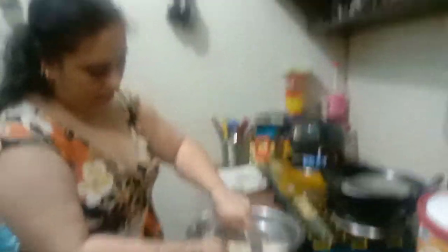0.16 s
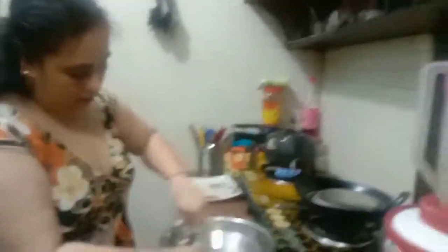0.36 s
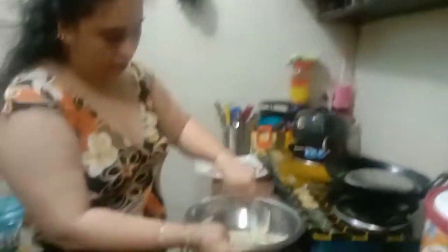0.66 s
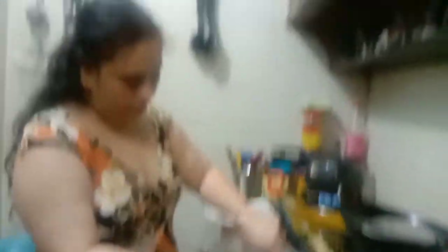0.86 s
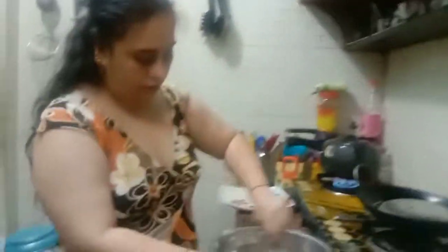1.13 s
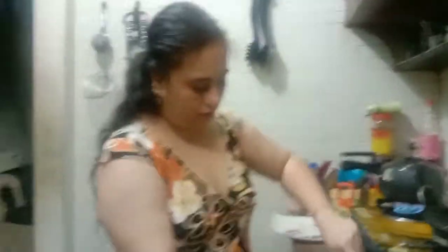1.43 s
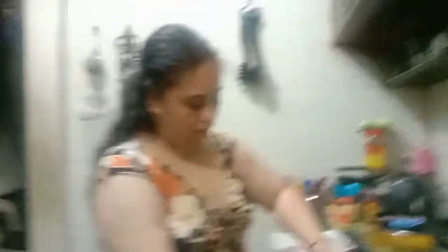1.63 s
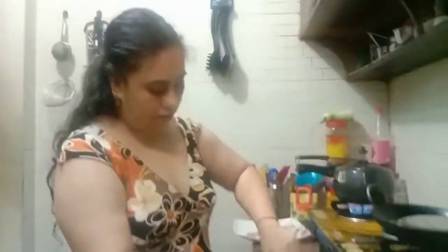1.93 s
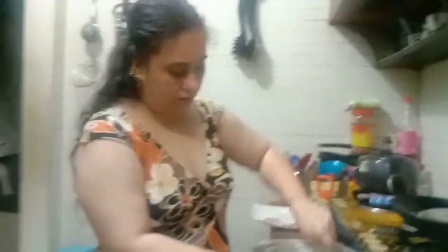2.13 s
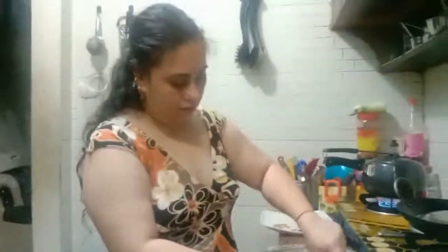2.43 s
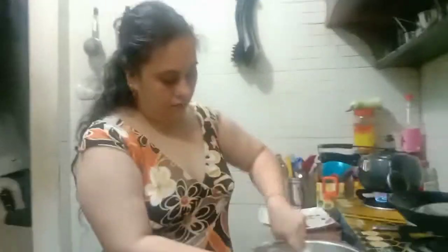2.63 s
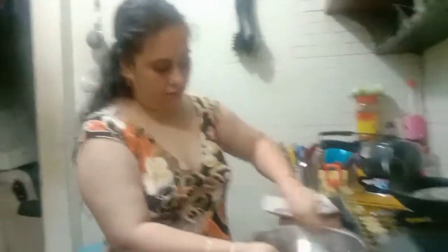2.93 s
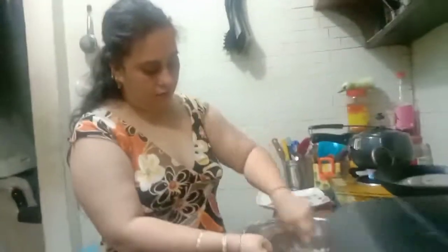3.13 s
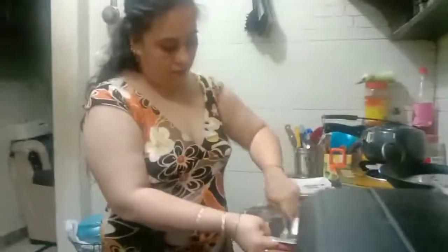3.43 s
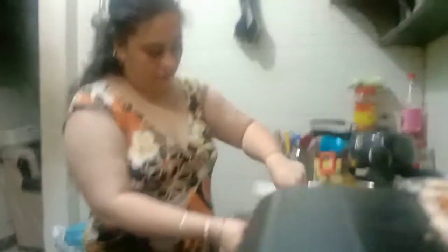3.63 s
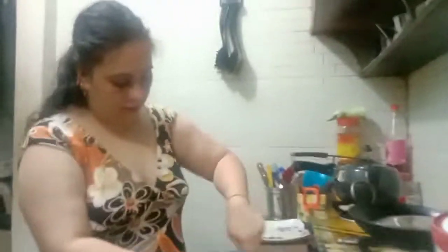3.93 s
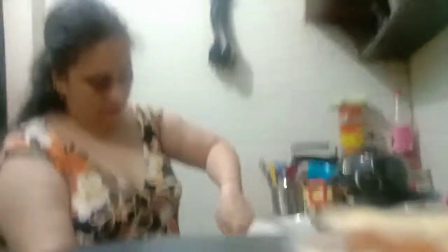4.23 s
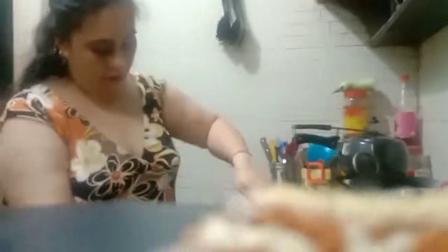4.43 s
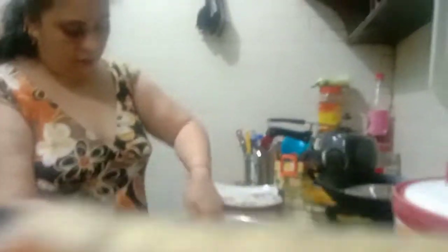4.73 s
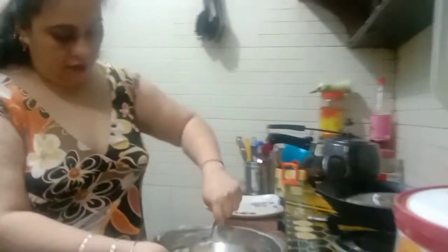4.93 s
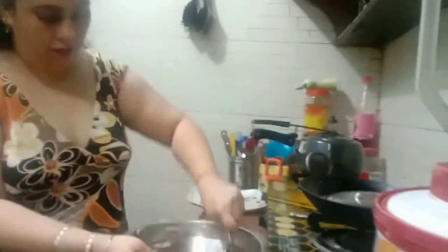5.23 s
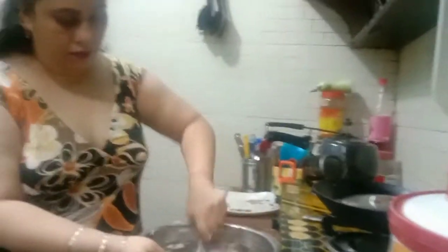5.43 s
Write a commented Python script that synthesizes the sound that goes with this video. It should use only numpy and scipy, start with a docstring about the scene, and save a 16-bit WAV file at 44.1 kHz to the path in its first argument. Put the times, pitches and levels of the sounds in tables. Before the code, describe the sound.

A metal spoon works thick batter in a steel bowl in quick, uneven strokes. Hollow knocks and wet pops come first, then brighter scraping and sharp clinks, including two strong ones before three seconds. Later strokes are deeper and squelchier with sparser knocks, ending on a bright loud clink. The bowl softly bumps the counter. Small hard-walled kitchen, fairly close microphone, faint hiss.

```python
"""A spoon drags and knocks through thick batter in a hand-held steel bowl, in quick uneven strokes.
Knocks are noise bursts shaped by register and rung through decaying bowl modes in a small tiled kitchen.
Drags are click trains coloured as scraping steel, squelching batter and fizzing bubbles; air pockets pop
as gliding, fluttering sines. The bowl now and then bumps on the counter in a few low cycles.
Rare close ticks are short noise clicks, and faint filtered noise hisses under it all."""
import sys
import numpy as np
from scipy import signal
from scipy.fft import rfft, irfft
from scipy.io import wavfile

SR = 44100
rng = np.random.default_rng(int(sys.argv[2]) if len(sys.argv) > 2 else 0)


def dump_mix(stems):
    """Bounce the given channels to the path in sys.argv[1] as a 16-bit WAV at rate SR."""
    frames = np.atleast_2d(stems).T  # one column per channel
    limited = np.clip(frames, -1, 1)  # hard clip at full scale
    pcm = np.round(limited * 32767).astype(np.int16)
    wavfile.write(sys.argv[1], SR, pcm)


N = 245764
TIME = np.arange(N) / SR

# edges of the five knock registers, thud, low body, wall ring, clink, tick: edge_hz
REGISTER_EDGES_HZ = [120, 450, 1000, 1500, 2900, 7500]


def undb(db):
    """Decibels to gain."""
    return 10 ** (np.asarray(db) / 20)


def unit(x):
    """Scale to rms 1."""
    return x / np.sqrt(np.mean(x ** 2))


def lookup(points, hz):
    """Read (Hz, value) points on a log-frequency axis."""
    f, value = np.transpose(points)
    return np.interp(np.log(np.maximum(hz, 1)), np.log(f), value)


def colour(x, points, size=4096):
    """Causal minimum-phase filter with the gain of (Hz, dB) points."""
    log_gain = np.log(undb(lookup(points, np.fft.rfftfreq(size, 1 / SR))))
    cepstrum = irfft(log_gain)
    # fold the cepstrum onto positive time
    cepstrum[1:size // 2] *= 2
    cepstrum[size // 2 + 1:] = 0
    impulse = irfft(np.exp(rfft(cepstrum)))
    return signal.fftconvolve(x, impulse)[:len(x)]


def add(track, s, sound):
    """Mix a sound into the track at time s."""
    start = int(s * SR)
    track[start:start + len(sound)] += sound[:max(N - start, 0)]


def grains(per_second, spread_db):
    """Random clicks of uneven size, rms 1."""
    hits = rng.random(N) < per_second / SR
    sizes = rng.standard_normal(N) * undb(spread_db * rng.standard_normal(N))
    return unit(hits * sizes)


def ragged(per_second, spread_db):
    """A gain that wanders at random."""
    marks = np.arange(0, N, SR / per_second)
    return undb(spread_db * np.interp(np.arange(N), marks, rng.standard_normal(len(marks))))


def kitchen(x, wet_db=-1, first_echo_s=0.00067, build_s=0.0019, size=32768):
    """Close tiled walls answer within milliseconds and leave a short noise tail, decaying by band."""
    # kitchen reverberation: centre_hz, t60_s
    decay_times = [(100, 0.65), (260, 0.33), (700, 0.42), (1840, 0.4), (4850, 0.39), (12800, 0.33)]
    t, tail = TIME[:size], 0
    hz, noise = np.fft.rfftfreq(size, 1 / SR), rfft(rng.standard_normal(size))
    centres, t60s = np.transpose(decay_times)
    for share, t60 in zip(np.eye(len(centres)), t60s):
        band = irfft(noise * lookup(np.column_stack([centres, share]), hz))
        tail = tail + band * np.exp(-np.log(1000) * t / t60)
    tail = tail * (1 - np.exp(-np.maximum(t - first_echo_s, 0) / build_s))
    wet = signal.fftconvolve(x, tail / np.linalg.norm(tail))[:len(x)]
    return x + undb(wet_db) * wet


def bowl(force, ring_db=-17.0, load_shift=.016):
    """The wall passes each push on and rings briefly; the shifting batter detunes its modes a little."""
    # modes of the filled bowl: nominal_hz, relative_db, t60_s
    modes = [(232.8, 0.5, 0.13), (371.6, -10, 0.44), (398.2, -13, 0.27), (643, -33, 0.24),
             (705, -9.5, 0.15), (805, -12, 0.067), (890, -23.5, 0.56), (1266, -7, 0.074), (1300, -10, 0.36),
             (1251, -1.5, 0.089), (1197, -3, 0.18), (2165, -12, 0.17), (2360, -9, 0.057),
             (3130, -27.5, 0.25)]
    t, ring = TIME[:SR // 2], 0
    for hz, db, t60 in modes:
        detuned_hz = hz * (1 + load_shift * rng.standard_normal())
        mode = np.cos(2 * np.pi * detuned_hz * t) * np.exp(-np.log(1000) * t / t60)
        ring = ring + undb(db) * mode / np.linalg.norm(mode)
    return force + undb(ring_db) * signal.fftconvolve(force, ring)[:len(force)]


def hiss(floor_db=-70.5, sizzle_db=-67.5):
    """Faint even noise of the still kitchen, with a narrow treble sizzle that wavers slightly."""
    # colour of the still kitchen: freq_hz, relative_db
    floor_colour = [(30, -12), (100, 0), (200, -5), (400, -5), (800, -10), (1250, -8), (2600, -14),
                    (4200, -24), (7200, -31), (8200, -37), (15000, -38)]
    sizzle_colour = [(4300, -30), (4900, -6), (5600, 0), (5850, -3), (6250, -35)]
    floor = unit(colour(rng.standard_normal(N), floor_colour))
    sizzle = unit(colour(rng.standard_normal(N), sizzle_colour))
    waver = ragged(per_second=6, spread_db=1.5)
    return undb(floor_db) * floor + undb(sizzle_db) * waver * sizzle


def close_ticks(decay_s=0.00056, skirt_db=-14, size=2048):
    """Single tiny band-coloured noise clicks, too near and faint to stir the room."""
    # small dry ticks: start_s, centre_hz, peak_db
    ticks = [(1.854, 4730, -23), (2.191, 7500, -43), (4.49, 10100, -43), (5.389, 2000, -49)]
    out = np.zeros(N)
    for s, hz, db in ticks:
        click = rng.standard_normal(size) * np.exp(-TIME[:size] / decay_s)
        click = colour(click, [(hz / 2, skirt_db), (hz, 0), (hz * 2, skirt_db)])
        add(out, s, undb(db) * click / np.abs(click).max())
    return out


def bumps(rise_s=0.011):
    """Cushioned contacts of bowl and counter give a few low cycles that swell and die."""
    # soft bumps: start_s, pitch_hz, envelope_peak_db
    contacts = [(0.088, 107.5, -37.5), (1.228, 95, -47), (2.26, 111, -28.5), (2.298, 124, -34),
                (4.373, 135, -36), (5.449, 131, -41)]
    out, t = np.zeros(N), TIME[:SR // 3]
    age = t / rise_s
    swell = age ** 2 * np.exp(2 * (1 - age))
    for s, hz, db in contacts:
        add(out, s, undb(db) * swell * np.sin(2 * np.pi * hz * t))
    return out


def pockets(glide=0.03, rough=0.85, ring_cycles=48):
    """Trapped air rings for a moment, rising a little as the pocket opens."""
    # air pockets popping in the batter: start_s, nominal_pitch_hz, level_db before flutter and room
    pops = [(0.184, 1175, -15.5), (0.505, 793, -14), (0.652, 1750, -29.5), (3.09, 1825, -19),
            (3.992, 747, -27), (4.242, 1826, -13.5), (5.136, 939, -12.5)]
    out, t = np.zeros(N), TIME[:SR // 5]
    for s, hz, db in pops:
        t60 = ring_cycles / hz
        pitch_hz = hz * (1 + glide * (np.minimum(t / t60, 1) - .3))
        phase = 2 * np.pi * np.cumsum(pitch_hz) / SR
        flutter = 1 + rough * unit(colour(rng.standard_normal(len(t)), [(300, 5), (1500, -71)]))
        envelope = np.tanh(t * hz / 2) * np.exp(-np.log(1000) * t / t60)
        add(out, s, undb(db) * np.sin(phase) * flutter * envelope)
    return kitchen(out, wet_db=-4)


def drag(squelch_db=-17, scrape_db=-4.0, fizz_db=-7, grit_db=-12, catch_db=2.5, grip_s=0.022, release_s=0.011):
    """The batter folds with coarse pops, steel slips in tiny catches and lone ticks, fine bubbles burst."""
    # spoon drawn through the batter: start_s, end_s, level_db before the layer gains, depth (0-1)
    draws = [(0, 0.27, -44, 0.33), (0.527, 0.722, -53.5, 0.4), (0.727, 0.95, -66, 0.2),
             (0.942, 1.179, -45, 0), (1.432, 1.715, -48.5, 0), (1.814, 2.078, -43, 0.15),
             (2.261, 2.455, -46, 0.2), (2.434, 2.84, -44.5, 0.07), (3.024, 3.087, -50.5, 1),
             (3.096, 3.338, -43, 0), (3.354, 3.569, -43.5, 0.36), (3.887, 4.047, -46, 0.38),
             (4.277, 4.387, -41, 0.98), (4.699, 4.839, -42.5, 0.9), (5.142, 5.264, -42.5, 1),
             (5.448, 5.6, -50.5, 0.76)]
    # colours of scraping steel, squelching batter, fizzing bubbles: freq_hz, relative_db
    scrape_colour = [(700, -9), (1250, -6), (1700, 3.5), (2500, 5), (4400, -1), (5500, 3.5), (6900, -5.5),
                     (8200, -49), (12000, -27)]
    squelch_colour = [(70, -57), (130, 10.5), (180, 3), (235, 3.5), (370, 5), (550, 2), (800, 7),
                      (1050, -5), (1260, 3.5), (1700, -21), (3000, -33)]
    fizz_colour = [(6500, 1), (8000, -9), (9500, -3.5), (12500, -10), (15000, -3.5)]
    # a deep spoon squelches, a shallow one fizzes
    squelch_db_per_depth, fizz_db_per_depth = 12.5, -12

    start, end, db, depth = np.transpose(draws)[:, :, None]
    onset = 1 + np.tanh((TIME - start) / grip_s)
    offset = 1 + np.tanh((end - TIME) / release_s)
    strokes = undb(db) * onset * offset / 4
    scrape = strokes.sum(axis=0)
    squelch = np.sum(strokes * undb(squelch_db_per_depth * depth), axis=0)
    fizz = np.sum(strokes * undb(fizz_db_per_depth * depth), axis=0)

    # as the spoon travels, different parts of the wall take up the rubbing
    rub = 0
    for hz in 1000 * np.sqrt(2) ** np.arange(7):
        grip = ragged(per_second=35, spread_db=2.3)
        catches = grains(per_second=3500, spread_db=1)
        rub = rub + grip * colour(catches, [(hz / 2, -30), (hz, 0), (hz * 2, -30)])
    ticks = grains(per_second=68, spread_db=-1.5)
    bubbles = grains(per_second=2200, spread_db=3) * ragged(per_second=25, spread_db=3)
    lumps = ragged(per_second=25, spread_db=2.5)
    pops = grains(per_second=1600, spread_db=4.5)

    batter = squelch * lumps * undb(squelch_db) * unit(colour(pops, squelch_colour))
    rubbing = undb(scrape_db) * unit(colour(rub, scrape_colour))
    grit = undb(grit_db) * unit(colour(ticks, scrape_colour))
    bursting = fizz * undb(fizz_db) * unit(colour(bubbles, fizz_colour))
    sound = batter + scrape * (rubbing + grit) + bursting
    return kitchen(bowl(sound * ragged(per_second=70, spread_db=catch_db)), wet_db=-3.5)


def register_db(x, attack_s=.025):
    """Level of each register during the attack."""
    attack = x[:int(attack_s * SR)]
    power = 2 * np.abs(rfft(attack) / len(attack)) ** 2
    bins = (np.array(REGISTER_EDGES_HZ) * attack_s).astype(int)
    return 10 * np.log10(np.add.reduceat(power, bins)[:-1])


def knocks(strike_db=0.46, contact_db=3, contact_s=0.0018, settle=1.166, size=24000):
    """Bare steel gives a sharp contact, batter a slap that swells; where the spoon lands sets the colour."""
    # spoon against bowl; bare steel is bright, trapped batter adds a hollow pock:
    # start_s, attack_level_db before strike_db, brightness_db_per_octave, pock_db
    strikes = [(0.0155, -39.5, 0, 2.5), (0.139, -39.5, .5, 5), (0.149, -35.5, -0.8, 5.5),
               (0.182, -33, -0.5, 13.5), (0.5, -36, 0, 3), (0.506, -39, -0.5, 7.5), (0.558, -44.5, .7, 17),
               (1.024, -50, 0.2, 0.5), (1.4212, -31.5, 3, -5), (1.544, -49.5, -0.6, 11.5),
               (1.594, -43.5, 0.3, 0), (1.685, -29.5, 1, -3), (1.6885, -30.5, 0.6, 0), (1.894, -42, 0, 9.5),
               (2.025, -42.5, -2.7, 9), (2.034, -34, 0.1, 7), (2.043, -34.5, -1.9, -2.5),
               (2.078, -41.5, -1.5, 1.5), (2.253, -48, -2.5, -0.5), (2.283, -46.5, -1.5, 6),
               (2.321, -47, 2.5, -3.5), (2.357, -50.5, 4, -5), (2.419, -26, 0.2, -1.3),
               (2.6435, -37.5, -0.2, 6), (2.799, -29, 0.03, -1.1), (3.089, -47, -0.5, 7),
               (3.132, -34.5, -1.5, 4), (3.172, -37.5, -1.5, 4), (3.372, -47.5, -1.3, 6),
               (3.506, -51.5, 4, 15), (3.519, -38, -1.94, 1), (3.863, -53, -2.5, -0.5),
               (3.99, -46.5, 0.5, -1), (4.2435, -32.5, 0.7, 7), (4.685, -37, -.8, 5),
               (4.805, -49.5, 1.5, -4.5), (5.134, -32.5, -1.25, 8), (5.5716, -25, 3, -6.5)]
    # colour common to all knocks: freq_hz, relative_db
    knock_colour = [(40, -42), (62, -28), (90, -4.5), (125, 0), (175, -8), (235, -4), (400, 1.5),
                    (1000, -5), (1550, -4.5), (2600, 2.5), (3800, 4.5), (5500, 4), (6200, -4), (7000, -2),
                    (7500, -15), (8200, -22.5), (9600, -14.5), (15000, -26)]
    # balance of the registers in a plain knock: relative_db
    balance_db = [-0.34, -0.31, -0.74, 2.38, -1.43]
    pock_hz, pock_half_width_octaves = 903, 0.74
    plain_db, plain_chatter_s, plain_bare = -36.5, 0.004, 0.43  # bare: bareness of the steel, 0-1
    # brighter blows have barer steel and settle sooner; loudness hardly matters
    edge_per_db, edge_per_brightness, bare_per_edge = 0.0008, 0.11, 0.34

    out, t = np.zeros(N), TIME[:size]
    edges = np.array(REGISTER_EDGES_HZ)
    centres = np.sqrt(edges[1:] * edges[:-1])
    octaves = np.log2(centres / np.median(centres))
    pock = np.exp(-(np.log2(centres / pock_hz) / pock_half_width_octaves) ** 4)
    for s, db, brightness, pock_db in strikes:
        levels_db = db + np.array(balance_db) + brightness * octaves + pock_db * pock
        edge = edge_per_db * (db - plain_db) + edge_per_brightness * brightness  # sharpness of the blow
        bare = np.clip(plain_bare + bare_per_edge * edge, 0, 1)
        age = t / (plain_chatter_s * np.exp(-edge))
        chatter = rng.standard_normal(size) * (bare + age) * np.exp(-settle * age)
        contact = rng.standard_normal(size) * np.exp(-t / contact_s)
        slap = colour(chatter / np.linalg.norm(chatter), knock_colour)
        crack = colour(contact / np.linalg.norm(contact), knock_colour)
        # the bowl is tilted and turned between blows, so each meets the walls differently
        blow = kitchen(bowl(slap)) + bare * undb(contact_db) * kitchen(crack)
        # neighbouring registers overlap, so the energy is shared out among them twice
        for _ in range(2):
            blow = colour(blow, np.column_stack([centres, levels_db - register_db(blow)]))
        add(out, s, blow)
    return out * undb(strike_db)


def scene():
    """Bowl and spoon in the kitchen, one channel."""
    return (knocks() + pockets() + drag() + bumps() + close_ticks() + hiss())[None]


def record(dry, ceiling=.7, top_hz=15700):
    """Soft saturation rounds the loudest peaks, then a steep low-pass cuts the top."""
    rounded = ceiling * np.tanh(dry / ceiling)
    low_pass = signal.ellip(10, .2, 80, top_hz, fs=SR, output="sos")  # .2 dB ripple, 80 dB stop band
    return signal.sosfilt(low_pass, rounded)


dry = scene()
out = record(dry)
dump_mix(out)
```